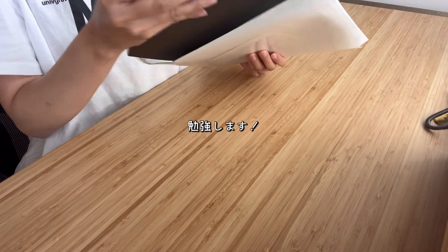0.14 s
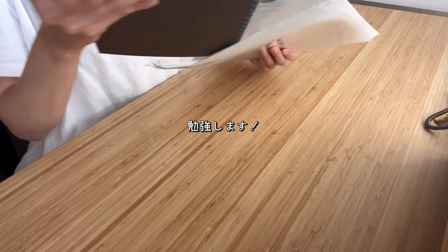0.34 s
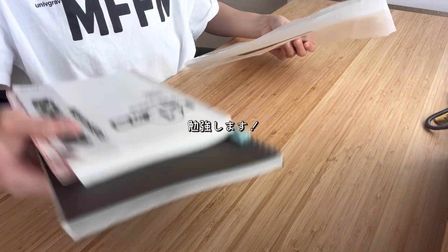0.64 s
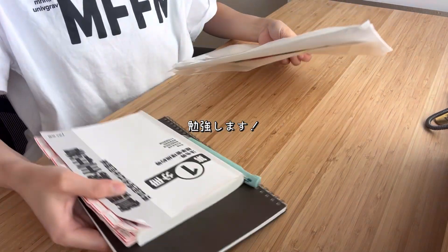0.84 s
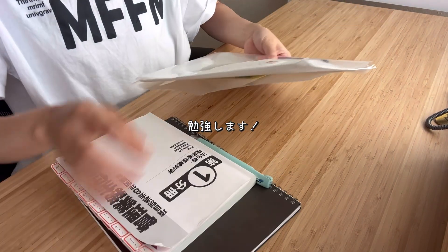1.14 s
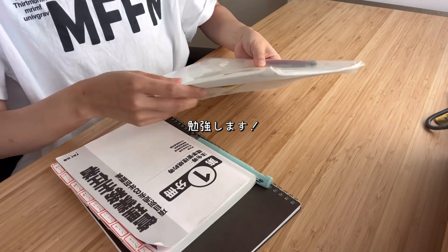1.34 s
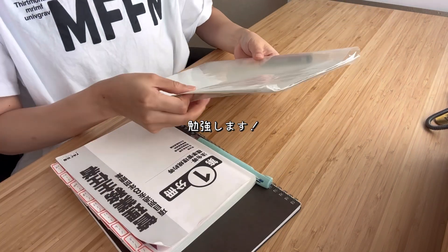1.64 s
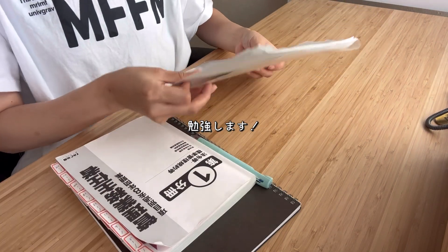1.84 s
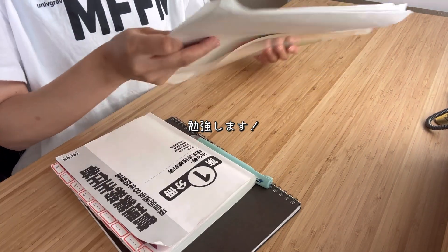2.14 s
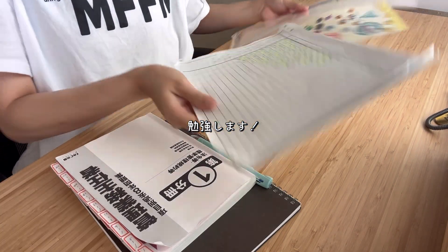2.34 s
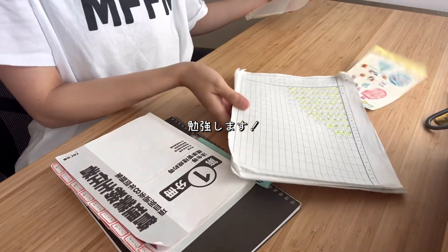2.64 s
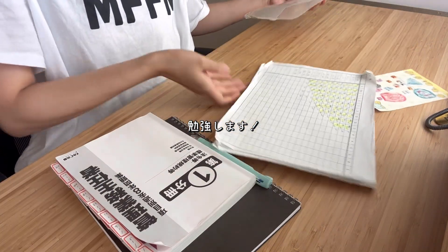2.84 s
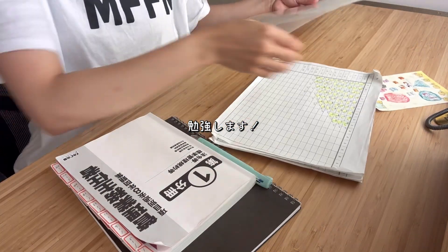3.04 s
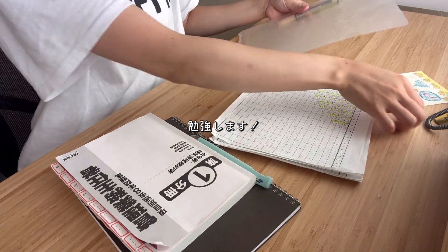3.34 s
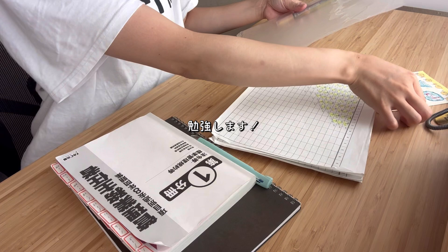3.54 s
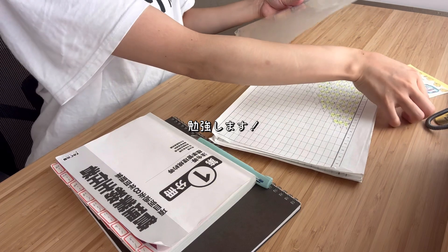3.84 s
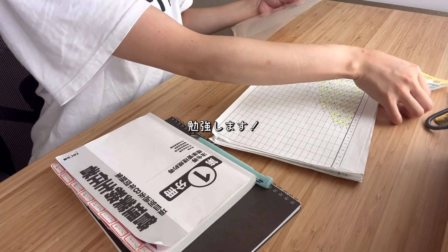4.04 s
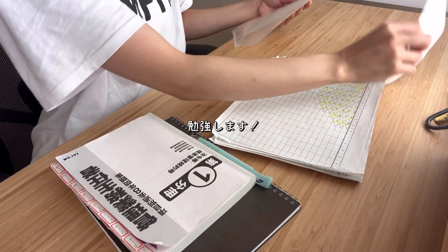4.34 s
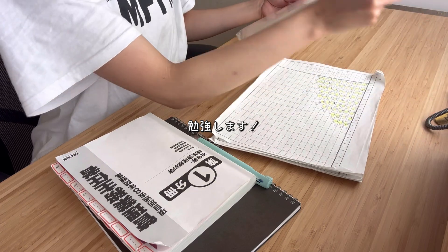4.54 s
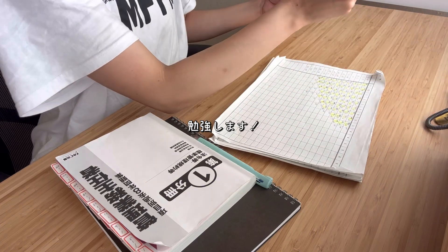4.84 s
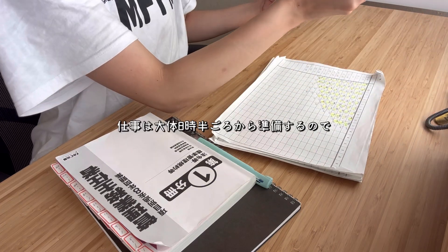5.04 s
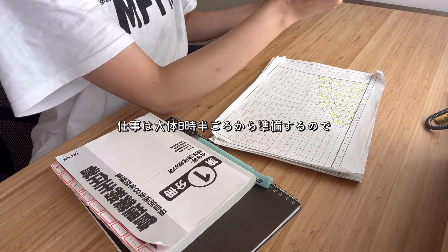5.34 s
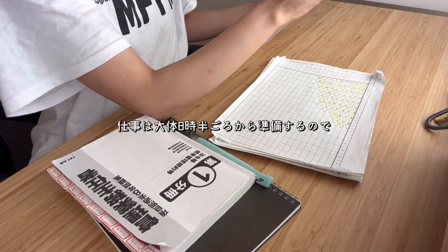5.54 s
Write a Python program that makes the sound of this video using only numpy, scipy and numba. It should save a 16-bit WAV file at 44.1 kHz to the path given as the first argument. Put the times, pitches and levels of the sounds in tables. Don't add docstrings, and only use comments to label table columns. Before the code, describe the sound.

A close stereo microphone on a wooden desk in a small, quiet room, with low hum, faint hiss and barely audible short reflections. From 0 s sheets rustle and slide, with a papery tap and flick near 0.1 s and crackling taps around 0.2 and 0.4 s. At about 0.77 s a pile of books claps together in a rapid cluster of slaps, and at 1.08 s a hard edge strikes the desk: the loudest sound, a sharp knock with a short woody ring and a small settling thud. Light creases and crisp snaps follow at 1.3-1.9 s. From 2 to 2.45 s paper swishes strongly, then sheets are set down with a soft papery tap near 2.6 s. It becomes quiet, with a soft contact at 3.3 s, bright card flicks at 4.07 s, a tap near 4.16 s and a swish at 4.3 s. Faint taps lead to rustling around 5.2-5.45 s and a final crinkle at 5.68 s.

```python
import sys
import numpy as np
from scipy import signal
from scipy.fft import rfft, irfft
from scipy.io import wavfile
from scipy.ndimage import uniform_filter1d
from numba import njit

SR = 44100
rng = np.random.default_rng(int(sys.argv[2]) if len(sys.argv) > 2 else 0)


def attenuation_scalar(level_db):
    decades = np.asarray(level_db, float) / 20
    return 10 ** decades


def waveform_to_disk(signal):
    frames = np.transpose(np.atleast_2d(signal))
    scaled = np.clip(frames, -1, 1) * 32767
    samples = np.round(scaled).astype(np.int16)
    wavfile.write(sys.argv[1], SR, samples)


N = 250929
HZ = np.fft.rfftfreq(N, 1 / SR)
TIME = np.arange(N) / SR


def unit(x):
    return x / np.sqrt(np.mean(x ** 2))


def shape(table):
    hz, db = np.transpose(table)
    return attenuation_scalar(np.interp(np.log(HZ + 1), np.log(hz), db))


def band(x, low_hz, high_hz):
    sections = signal.butter(3, [low_hz, high_hz], "band", fs=SR, output="sos")
    return signal.sosfilt(sections, x)


def add(out, s, sound, left_db):
    i = int(s * SR)
    sound = sound[..., :N - i]
    gains = attenuation_scalar(np.array([[left_db / 2], [-left_db / 2]]))
    out[:, i:i + sound.shape[-1]] += sound * gains


def fade(t, t60):
    return np.exp(-np.log(1000) * t / t60)


def walk(rate):
    hold = int(SR / rate)
    held = np.repeat(rng.standard_normal(N // 100), hold)[:N]
    return uniform_filter1d(held, hold // 2)


@njit
def svf(x, hz, sharp):
    y, b, l = np.empty(len(x)), 0., 0.
    for i in range(len(x)):
        g = np.tan(np.pi * hz[i] / SR)
        v = (b + g * (x[i] - l)) / (1 + g * (g + 1 / sharp))
        b, l, y[i] = 2 * v - b, l + 2 * g * v, v / sharp
    return y


def hum():
    # f/Hz, level/dB per Hz
    murmur = [(70, -19), (110, -9), (160, -11), (233, -11.5), (410, -27), (800, -31.5), (3000, -41.5),
              (6800, -44), (7900, -40.5), (9000, -41.5), (11000, -50), (14300, -46.5), (15900, -41)]
    # t/s, level/dB
    arm_weight = [(0, -58), (.51, -59), (.568, -69), (.75, -59), (.95, -53), (1.35, -56.5), (1.75, -63),
                  (2.05, -61), (2.12, -52), (2.22, -58), (2.36, -57), (2.85, -58), (2.93, -73), (3.31, -53),
                  (3.66, -65.5), (3.77, -59), (4.4, -67), (4.95, -59.5), (5.69, -63)]
    mid, left, right, shake = rng.standard_normal((4, N))
    apart = np.clip(HZ / 1500, .1, 1)
    pair = np.sqrt(1 - apart) * rfft(mid) + np.sqrt(apart) * rfft(np.array([left, right]))
    room = unit(irfft(pair * shape(murmur), N))
    desk = band(shake, 46, 127) + 1.1 * band(shake, 54, 70)
    desk = desk + .5 * band(shake, 134, 150) + .9 * band(shake, 192, 212)
    s, db = np.transpose(arm_weight)
    tremble = unit(desk) * attenuation_scalar(np.interp(TIME, s, db))
    return attenuation_scalar(-67 + 3.5) * room + tremble


@njit
def walls(x, lags, gain, damp):
    line, soft, out = np.zeros((8, 4096)), np.zeros(8), np.zeros((2, len(x)))
    for i in range(len(x)):
        total = 0.
        for k in range(8):
            soft[k] += (1 - damp) * (gain[k] * line[k, (i - lags[k]) & 4095] - soft[k])
            total += soft[k]
            out[k % 2, i] += soft[k] * (1 - (k & 2))
        for k in range(8):
            line[k, i & 4095] = x[i] + soft[k] - total / 4
    return out


def echo(near):
    t60_s, damp, echo_db = 0.25, 0.25, -15.5
    lags = rng.integers(170, 1100, size=8)
    source = band(near.mean(axis=0), 280, 14000)
    return attenuation_scalar(echo_db) * walls(source, lags, attenuation_scalar(-60 * lags / SR / t60_s), damp)


def knock(blows, modes):
    t = TIME[:SR]
    ring = sum(attenuation_scalar(db) * np.sin(2 * np.pi * hz * t) * fade(t, t60) for hz, db, t60 in modes)
    out = np.zeros((2, N))
    for s, db, ms in blows:
        push = np.hanning(int(ms * SR / 1000) + 3)
        add(out, s, attenuation_scalar(db) * signal.fftconvolve(ring, push / push.sum()), 0)
    return out


def pile_landing():
    # t/s, level/dB, contact/ms
    pile_hits = [(.7665, -44, .3), (.776, -27.5, 0.7), (.7795, -30, 0.9), (.7872, -28.5, 0.5),
                 (.7908, -32, .9), (.7945, -34, .6), (.7988, -36, 0.15), (.8053, -36, .8), (.8115, -36, .2),
                 (.8158, -31.5, 0.7)]
    # f/Hz, level/dB, T60/s
    pile_modes = [(64, -14, 0.56), (199, -25, 0.15), (272, 2, 0.036), (330, -6, 0.04), (416, -6, 0.035),
                  (554, -8, 0.04), (700, -2.5, 0.035), (850, -7, 0.04), (1050, -7, .04), (1300, -10, 0.03),
                  (1810, -20, .03), (2190, -20, .03)]
    return knock(pile_hits, pile_modes)


def desk_blows():
    # t/s, level/dB, contact/ms
    book_hits = [
        (1.0795, -20, 0.88),
        (1.097, -37.5, 0.96),
        (1.110, -26, 2.3),
    ]
    # t/s, level/dB, contact/ms
    soft_hits = [(0.089, -40, 2.4), (1.53, -45, 3.2), (1.899, -39, 4), (2.116, -44, 5.3), (2.162, -48, 5),
                 (2.597, -42.5, 1.43), (3.297, -46, 2.9)]
    # f/Hz, level/dB, T60/s
    desk_modes = [(60.5, -17.5, 0.62), (109.3, -13.5, 0.12), (139.5, -5, 0.26), (208, 2, 0.12),
                  (264.3, -3, 0.13), (390, -8, 0.073), (485, -8.5, 0.086), (538, -12.5, .1),
                  (705, -14, .07), (795, -15, 0.059), (860, -16, 0.08), (1000, -17, 0.072),
                  (1060, -25, 0.087), (1390, -17, 0.11), (1750, -19, .08), (2100, -21, .06)]
    return knock(book_hits + soft_hits, desk_modes)


def edge_strike():
    # t/s, peak level/dB, f/Hz, rise/s
    hard_edge = (1.0757, -10, 960, .00055)
    s, db, hz, rise = hard_edge
    out, t = np.zeros((2, N)), TIME[:SR // 100]
    swell = t / rise * np.exp(1 - t / rise)
    add(out, s, -attenuation_scalar(db) * np.cos(2 * np.pi * hz * (t - rise)) * swell, 0)
    return out


def taps():
    # t/s, peak level/dB, f/Hz, T60/s
    paper_contacts = [(.0875, -25, 330, 0.029), (.209, -37, 600, .04), (.231, -40.5, 515, .035),
                      (.399, -36, 683, 0.075), (.415, -37.5, 523, 0.042), (.711, -52, 900, 0.045),
                      (1.359, -43, 437, 0.053), (1.474, -51, 435, .05), (1.641, -48, 348, .078),
                      (1.8, -46, 469, 0.13), (1.88, -40.5, 462, 0.11), (2.005, -35, 700, 0.04),
                      (2.077, -44, 480, 0.17), (2.101, -42, 300, .04), (2.109, -43, 900, 0.033),
                      (2.155, -45, 800, .04), (2.168, -44, 500, .04), (2.213, -46, 800, .04),
                      (2.454, -42, 1100, 0.052), (2.511, -47, 440, .045), (2.548, -43, 855, .05),
                      (2.577, -39.5, 1510, 0.11), (2.5945, -29.5, 330, .045), (2.612, -34, 1014, 0.06),
                      (2.699, -44.5, 380, .045), (2.777, -47.5, 1016, 0.075), (2.917, -55.5, 1100, 0.051),
                      (3.275, -43, 330, .07), (3.292, -37, 289, 0.15), (3.38, -49, 297, 0.037),
                     (3.599, -49, 600, 0.069), (3.687, -53, 568, .14), (3.806, -41, 280, 0.11),
                     (3.871, -45, 330, .06), (4.113, -41, 700, .075), (4.147, -49, 800, .03),
                     (4.1615, -34, 600, 0.06), (4.7025, -43, 600, .05), (4.778, -54, 500, .038),
                     (4.8195, -41, 700, 0.07), (4.836, -48, 700, .04), (4.903, -45, 606, .05),
                     (4.912, -40, 330, 0.056), (5.351, -51, 384, 0.079), (5.421, -40, 1650, 0.09),
                     (5.567, -48, 390, 0.048), (5.675, -37, 1330, 0.11)]
    tick_rise, tick_s = 1.4, .0013
    left_db = -3
    out, t = np.zeros((2, N)), TIME[:SR // 6]
    rows = paper_contacts
    chance = rng.standard_normal((len(rows), 3, 4))
    crumple = rng.standard_normal((len(rows), 2, len(t)))
    for (s, db, hz, t60), c, noise in zip(rows, chance, crumple):
        others = np.sin(2 * np.pi * hz * np.exp(0.302 * c[0])[:, None] * t)
        ring = np.sin(2 * np.pi * hz * t) + (0.5 + .45 * c[1:]) @ others
        rustle = unit(band(noise, 0.93 * hz, 3.2 * hz)) * fade(t, 1.18 * t60)
        ring = unit(ring) * fade(t, t60) + 0.6 * rustle
        ring = ring * (1 - np.exp(-t / 0.0015))
        turns = hz * (t + tick_rise * tick_s * (1 - np.exp(-t / tick_s)))
        tick = np.sin(2 * np.pi * turns) * fade(t, 0.02)
        scrape = .3 * unit(band(noise, 450, 3000)) * fade(t, 0.0064)
        ring = ring + tick + scrape
        add(out, s, attenuation_scalar(db + 1.5) * ring / np.abs(ring).max(), left_db)
    return out


def snaps():
    # t/s, peak level/dB, centre f/Hz
    sheet_creases = [(.4139, -35.5, 4440), (.4548, -39.5, 2060), (.5681, -61, 3700), (.61, -57, 5070),
                     (.7107, -62, 2020), (.7254, -55, 3800), (.9122, -41, 6200), (1.0739, -38.5, 2100),
                     (1.3158, -44, 2600), (1.4749, -49, 2710), (1.525, -33, 3130), (1.6421, -37, 3150),
                     (1.868, -45, 3370), (2.0052, -36, 2410), (2.109, -44, 4000), (2.342, -42, 4500),
                     (2.4527, -52, 3970), (2.5784, -36, 3120), (2.6145, -35, 2300), (2.6652, -35, 4500)]
    # t/s, peak level/dB, centre f/Hz
    cover_claps = [(.7657, -35, 4770), (.7727, -24, 5200), (.7764, -31, 1930), (.7838, -28, 4350),
                   (.7985, -34, 1800), (.8114, -32, 3300), (.8254, -36, 6330), (.8404, -39, 6300)]
    # t/s, peak level/dB, centre f/Hz
    card_creases = [(3.2878, -48.5, 2700), (3.402, -55, 4020), (3.5966, -57, 3220), (3.619, -46.5, 3700),
                    (3.865, -51, 6200), (4.1615, -35, 3900), (4.3023, -40, 2297), (4.7759, -49, 3800),
                    (4.7949, -49, 2530), (5.0477, -48.5, 3070), (5.0942, -49, 2100), (5.2142, -41.5, 4710),
                    (5.3405, -38, 5950), (5.6755, -34, 2520)]
    # t/s, peak level/dB, centre f/Hz
    edge_flicks = [(.085, -26, 3100), (4.0655, -29, 5840), (4.0685, -29, 6300), (4.075, -33, 5500),
                   (4.5869, -46, 6500)]
    # T60/s, bright edge level/dB re peak at 3 kHz
    snap_kinds = [
        (.042, -16),
        (.022, -8),
        (.046, -14),
        (.021, -7),
    ]
    brighter_db_per_octave = 7
    out, t = np.zeros((2, N)), TIME[:SR // 8]
    tables = (sheet_creases, cover_claps, card_creases, edge_flicks)
    rows = [row + kind for table, kind in zip(tables, snap_kinds) for row in table]
    chance = rng.standard_normal((len(rows), 3, len(t)))
    for (s, db, hz, t60, bright_db), c in zip(rows, chance):
        bright_db = bright_db + brighter_db_per_octave * np.log2(hz / 3000)
        noise = c[0] + 0.92 * c[1:]
        panel = unit(band(noise, 0.45 * hz, 7670) + 1.3 * band(noise, hz * 0.76, hz * 1.25))
        burst = panel + attenuation_scalar(bright_db) * unit(band(noise, 12000, 16000))
        swell = (fade(t, t60) + 0.8 * fade(t, .004)) * (1 - np.exp(-t / 0.00028))
        add(out, s, attenuation_scalar(db - 5.5) * burst * swell, 0)
    return out


def patches():
    # t/s of the peak, width/s per 20 dB, level/dB, f/Hz
    singing = [(.02, .04, -54, 1150), (.085, .025, -50, 2950), (.145, .02, -56, 4500),
               (.31, .035, -53, 3800), (.345, .015, -57, 3300), (.375, .04, -58, 1850),
               (.770, .005, -45, 1350), (.775, .007, -38, 4700), (.786, .007, -43, 4400),
               (2.185, .015, -52, 7500), (2.275, .03, -54, 500), (2.315, .04, -54, 1550),
               (2.35, .04, -54, 2400), (2.37, .05, -53, 620), (2.37, .03, -56, 1100), (2.43, .03, -59, 750),
               (2.58, .04, -51, 1700), (2.625, .035, -52, 2300), (2.84, .03, -59, 2200),
               (2.83, .05, -60, 1050), (2.79, .02, -59, 1800), (3.27, .01, -58, 3500), (3.7, .04, -58, 650),
               (3.735, .04, -60, 2300), (1.8, .03, -55, 600), (1.9, .03, -55, 550), (1.32, .014, -55, 1700),
               (1.32, .014, -53, 2550), (1.318, .014, -51, 3900), (1.318, .014, -53, 5400),
               (2.615, .03, -48, 1000), (4.125, .02, -57, 800), (4.315, .025, -54, 2300),
               (4.55, .04, -61, 1050), (4.73, .04, -64, 2000), (5.42, .035, -49, 4250),
               (5.43, .035, -51, 1750), (5.45, .02, -50, 2300)]
    spread = .05
    out, t = np.zeros((2, N)), TIME[:SR // 5]
    middle = t[-1] / 2
    chance = rng.standard_normal((len(singing), 3, len(t)))
    for (s, width, db, hz), c in zip(singing, chance):
        song = unit(band(c[0] + .7 * c[1:], hz * (1 - spread), hz * (1 + spread)))
        swell = attenuation_scalar(db - 20 * ((t - middle) / width) ** 2)
        skip = max(int((middle - s) * SR) + 1, 0)
        add(out, s - middle + skip / SR, (song * swell)[:, skip:], 0)
    return out


def strokes():
    # t/s, held/s, hiss level/dB, weight/dB of the low voices re hiss
    dragged = [(0.0, .1, -54, 3), (.125, .15, -52, -6), (.275, 0.18, -58.5, 0.5), (.772, .03, -47, -1),
               (.85, .23, -61.5, 11.5), (1.313, 0.05, -61, 0.5), (1.375, 0.082, -68.5, -4),
               (1.475, 0.05, -63, -3), (1.521, 0.15, -60, 5), (1.68, .27, -64, -1),
               (1.95, .465, -52.5, -6.5), (2.43, .24, -56.5, 2.5), (2.67, .3, -65, -3),
               (2.778, .078, -62, 2), (3.262, 0.044, -63, 6), (3.31, 0.079, -70.5, 10),
               (3.403, 0.038, -65, 1), (3.866, 0.017, -60.5, -2.5), (4.068, .012, -45, -16),
               (4.1, 0.14, -58, -8), (4.29, .072, -48, -9), (4.42, .17, -64, -7), (4.59, .1, -73, 10),
               (4.702, 0.04, -71, 13), (4.776, .045, -68.5, 7.5), (5.035, 0.041, -66.5, 6.5),
               (5.216, .035, -53.5, -8), (5.26, .08, -62, -4.5), (5.53, 0.14, -62, -2.5)]
    # t/s of the peak, width/s per 20 dB, hiss level/dB, weight/dB
    swept = [(.226, 0.15, -61, 11), (.41, 0.1346, -65, 6.5), (.768, .025, -58, -4), (1.055, 0.06, -57, -2),
             (1.654, 0.0149, -53.5, -7), (1.755, 0.09, -61, -2.5), (1.804, 0.22, -67, 13),
             (2.13, 0.23, -47.5, -6), (2.349, 0.1139, -47.5, -14), (2.597, 0.1122, -59.5, 16.5),
             (2.84, .17, -58, -4), (3.295, 0, -68, 14), (3.655, 0.08, -57, -12),
             (3.72, 0.2252, -67.5, 10.5), (4.056, 0.07, -60.5, -5.5), (4.31, .14, -50, -8),
             (4.546, 0.1, -66, 7), (4.92, 0.03, -77.5, 18.5), (5.1, 0.23, -62, 0), (5.358, .05, -50, -1),
             (5.44, .11, -45.5, -3.5), (5.69, .022, -52, 10), (2.35, .13, -62, 8)]
    # share of the weight, offset/dB, resting level/dB, letting go/(dB/s)
    response = [
        (0, 0.04, -101, 400),
        (.3, -.5, -93.5, 329),
        (1, -0.53, -83, 239.5),
        (1.05, -4.5, -68, 198),
    ]
    catch_s, sag_db_per_s, roundness = .007, 10.5, 1.25
    t = TIME[::SR // 1000]
    s, held, db, weight = np.transpose(dragged)[..., None]
    drag = db - sag_db_per_s * np.clip(t - s, 0, held) - 40 * np.maximum(s - t, 0) / catch_s
    peak, width, top, heavy = np.transpose(swept)[..., None]
    sweep = top - 20 * (np.abs(t - peak) / width) ** roundness
    voices = []
    for share, offset_db, rest_db, let_go in response:
        released = drag - let_go * np.maximum(t - s - held, 0)
        each = np.vstack([released + share * weight, sweep + share * heavy])
        power = attenuation_scalar(2 * (each + offset_db)).sum(axis=0) + attenuation_scalar(2 * rest_db)
        voices.append(np.interp(TIME, t, 10 * np.log10(power)))
    return voices


def crackle():
    when, size = rng.random(N) < 70 / SR, rng.exponential(1, N)
    noise = rng.standard_normal((2, N)).cumsum(axis=0)
    pops = band(when * attenuation_scalar(3.5 * np.minimum(size, 3)) * noise, 900, 9000)
    return pops * attenuation_scalar(strokes()[1] + 17)


def slips(rate, spread_db):
    chance, size, noise = rng.random(N), rng.exponential(1, N), rng.standard_normal((2, N))
    clicks = (chance < rate / SR) * attenuation_scalar(spread_db * np.minimum(size, 3.5)) * noise[0]
    return unit(clicks) + 0.83 * noise[1]


def bends():
    # t/s, resonance f/Hz, strength
    curvature = [(0, 2900, .6), (.26, 3800, 2), (.34, 1870, 0.66), (1.2, 2600, 1.2), (1.8, 2400, 0.083),
                 (2.5, 1750, 0.37), (2.77, 1800, 2.1), (2.82, 2200, 2.6), (2.865, 2400, 0.36),
                 (3.68, 2300, 1.15), (3.95, 3650, 0.45), (4.22, 2300, 0.41), (4.48, 2100, 1.9),
                 (4.68, 1500, .9), (4.77, 2630, .8), (5.0, 3500, .4), (5.34, 1700, .8), (5.6, 2310, .6)]
    s, hz, strength = np.transpose(curvature)
    now = np.searchsorted(s, TIME, side="right") - 1
    return [uniform_filter1d(c[now], size=SR // 33) for c in (hz, strength)]


def sheets():
    # low f/Hz, high f/Hz, slips/(1/s), size spread/dB, channel likeness 0-1
    paper_voices = [
        (6110, 14700, 8300, 2.5, 0.63),
        (1800, 6110, 5000, 2, 0),
        (433, 1940, 3100, 0.5, 0.31),
        (124.9, 432.5, 680, 1, 0.38),
    ]
    # f/Hz, level/dB per Hz
    friction = [(100, 8), (300, 1), (1000, -2), (1700, -7), (2400, -2), (4300, -1), (7000, -6),
                (9500, -10.5), (13500, -10.5), (15500, -4.5), (16000, -30.5)]
    bend_hz, bend = bends()
    stutter, out = walk(60), 0
    for (low, high, rate, spread_db, like), db in zip(paper_voices, strokes()):
        shared, left, right = (slips(rate, spread_db) for _ in range(3))
        pair = np.sqrt(like) * shared + np.sqrt(1 - like) * np.array([left, right])
        pair = irfft(rfft(pair) * shape(friction), N)
        pair = pair + bend * np.array([svf(port, bend_hz, 10.6) for port in pair])
        limits = np.geomspace(low, high, num=5)
        panels = sum(band(pair, a, b) * attenuation_scalar(2.8 * walk(26)) for a, b in zip(limits, limits[1:]))
        out = out + unit(panels) * attenuation_scalar(db + 1.3 * stutter + 0.5)
    return out


def scene():
    near = pile_landing() + desk_blows() + edge_strike()
    near = near + taps() + snaps() + patches() + crackle() + sheets()
    return near + echo(near) + hum()


def roll_off(x):
    return signal.sosfilt(signal.butter(12, 16670, fs=SR, output="sos"), x)


def record(dry):
    # f/Hz, phase/rad
    port_lead = [(0, 0), (800, -.4), (1300, -.5), (2900, -2.7), (5500, -3.4), (7300, -3.0), (11500, -.8),
                 (13000, 0), (22050, 0)]
    # f/Hz, level/dB
    port_level = [(60, -4.5), (400, -5.5), (1300, -2), (2500, -1.5), (5000, -1), (9000, 3.5), (12000, -1)]
    low_cut_hz, mono_hz, top_hz = 52, 12300, 15900
    hz, rad = np.transpose(port_lead)
    port = np.sqrt(shape(port_level)) * np.exp(.5j * np.interp(HZ, hz, rad))
    pair = rfft(dry) * np.array([port, 1 / port])
    alike = (2 * pair.mean(axis=0) + pair) / 3
    pair = np.where(HZ > mono_hz, alike, pair)
    pair = pair * np.where(HZ > top_hz, attenuation_scalar(-14), 1)
    cut = signal.butter(3, low_cut_hz, "high", fs=SR, output="sos")
    mix = signal.sosfilt(cut, irfft(pair, N))
    return roll_off(mix)


dry = scene()
out = record(dry)
waveform_to_disk(out)
```